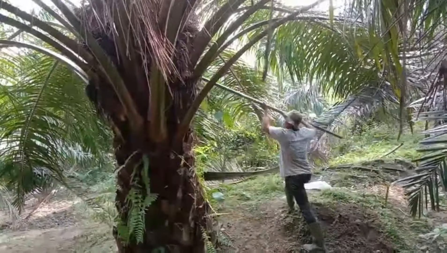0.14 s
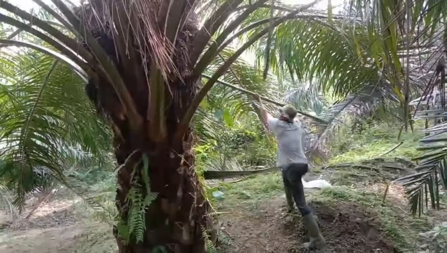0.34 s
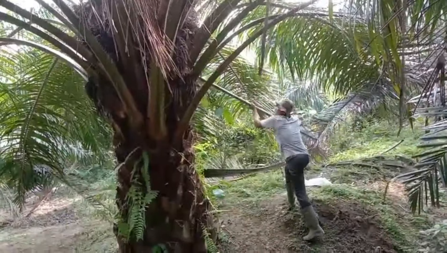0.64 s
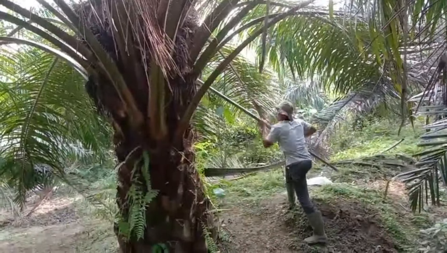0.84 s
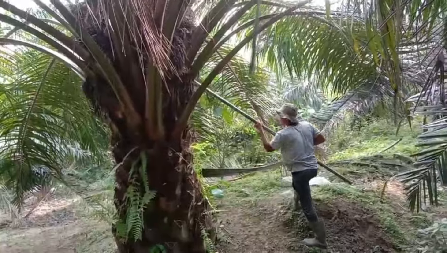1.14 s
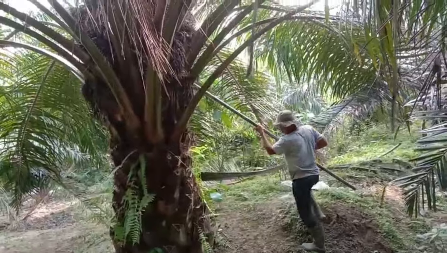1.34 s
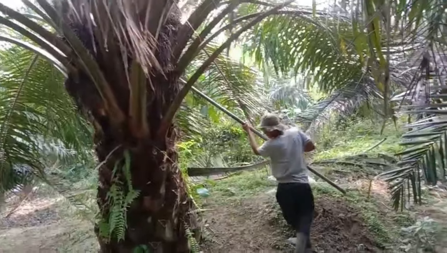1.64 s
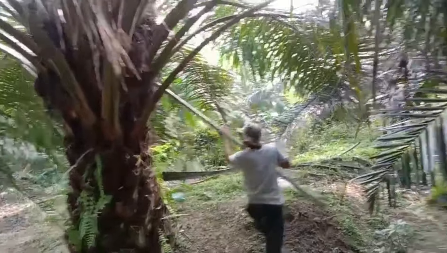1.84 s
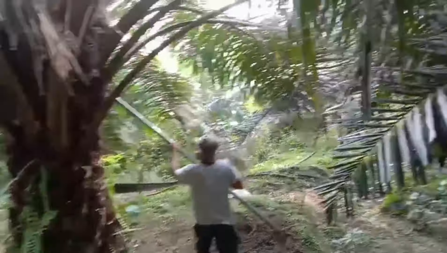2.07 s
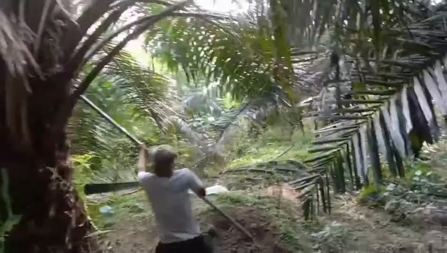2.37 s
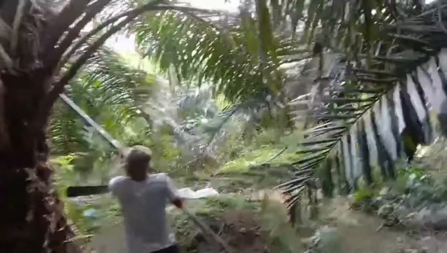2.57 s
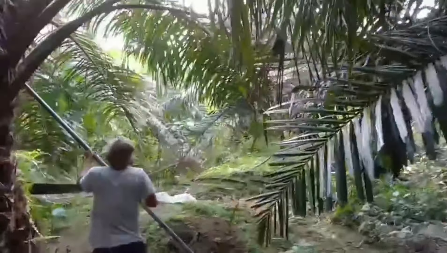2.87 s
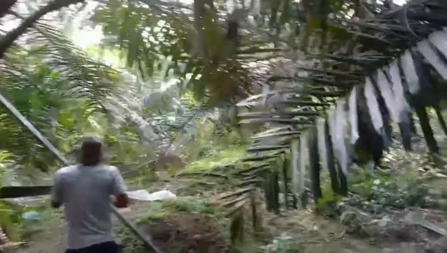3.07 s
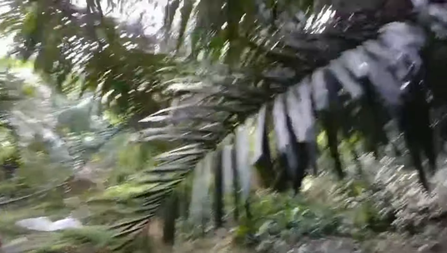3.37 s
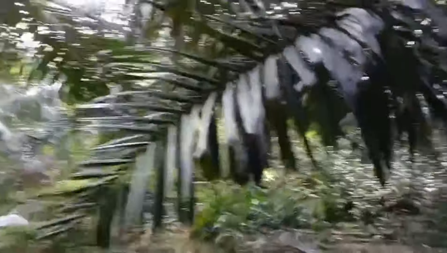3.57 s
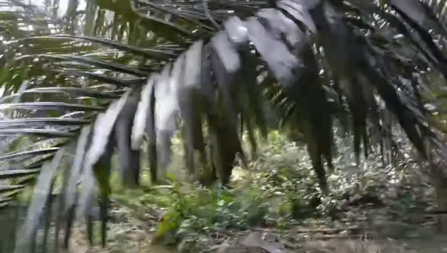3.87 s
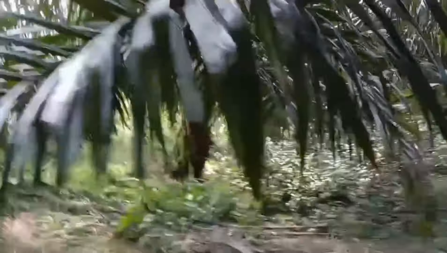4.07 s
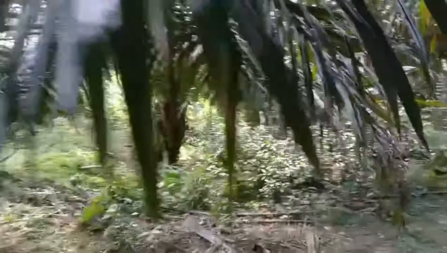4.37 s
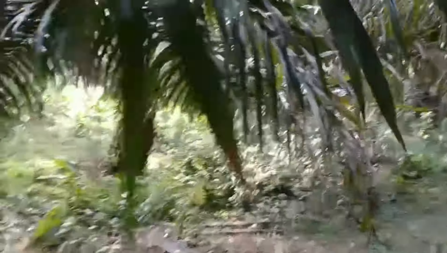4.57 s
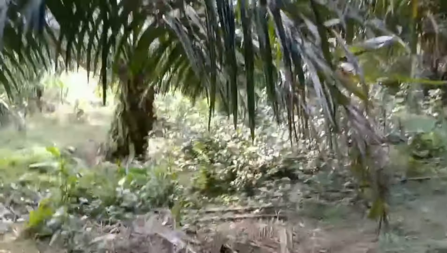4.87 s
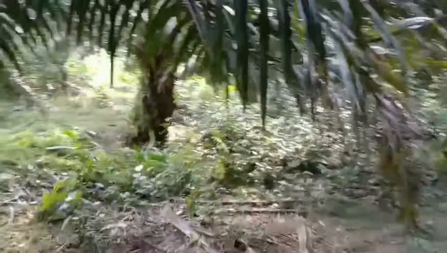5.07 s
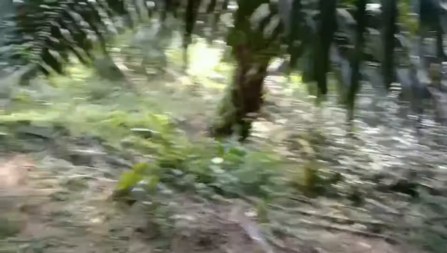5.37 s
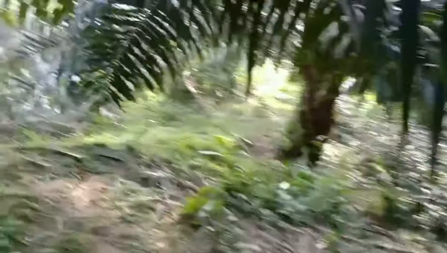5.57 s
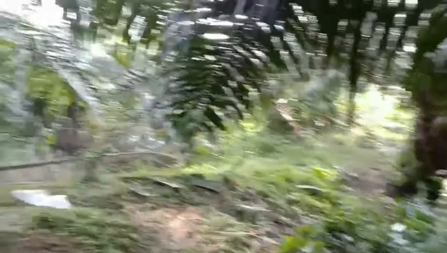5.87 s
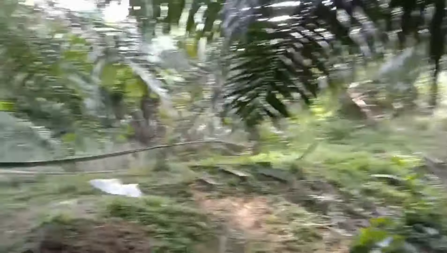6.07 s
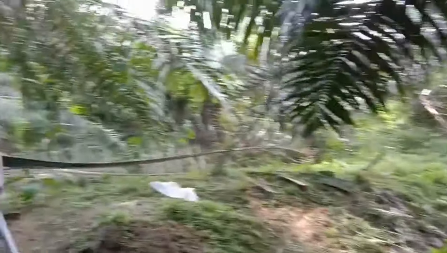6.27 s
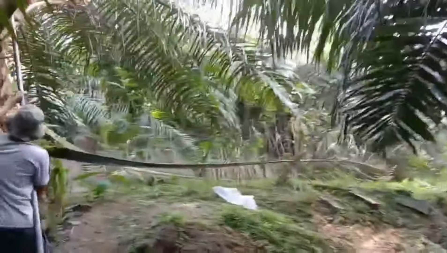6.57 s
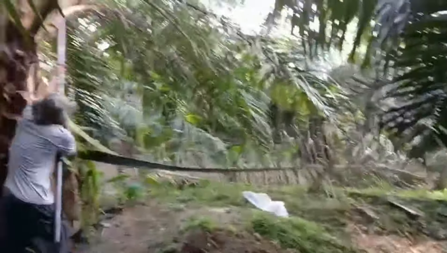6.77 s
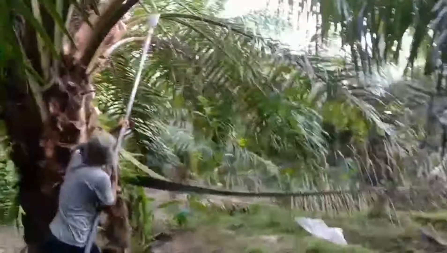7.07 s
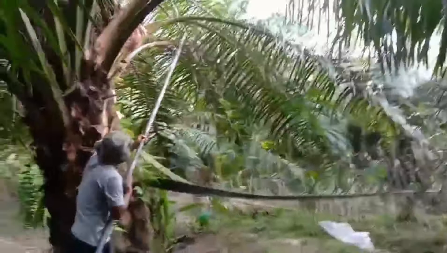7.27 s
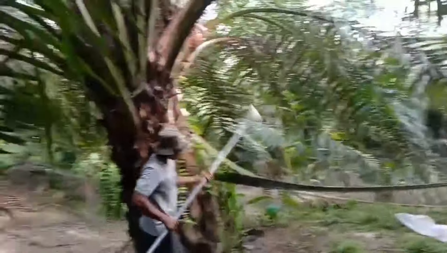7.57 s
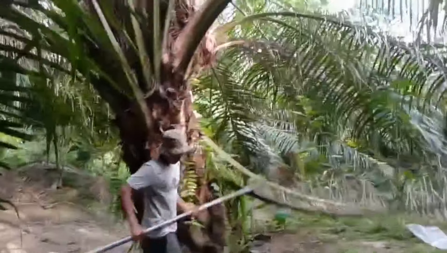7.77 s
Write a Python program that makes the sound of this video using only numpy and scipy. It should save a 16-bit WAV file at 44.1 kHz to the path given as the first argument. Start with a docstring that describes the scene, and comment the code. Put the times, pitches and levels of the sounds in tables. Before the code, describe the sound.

Dry palm fronds rustle, snap and crackle in bursts as a cutting blade and metal pole knock, ending in a loud clanking crash of leaves.

```python
"""Dry palm leaflets rustle and crackle as fronds sweep and snap: flickering bands of hiss, ticks and ringing ribs.
Stalks creak over a blade as a train of small slips, and thump or crack as short pushes of resonating noise.
A long metal pole with a sickle is knocked: its blade, tube and hook ring as dying sine waves with a dull echo.
Patchy, faint noise is the air of the plantation behind it all."""
import sys
import numpy as np
from scipy import signal
from scipy.io import wavfile

SR = 44100
rng = np.random.default_rng(int(sys.argv[2]) if len(sys.argv) > 2 else 0)


def ratio(d):
    """dB to gain"""
    e = np.asarray(d, float) / 20
    return 10 ** e


def wrap_up_sound(samples):
    """Save the sound to the file named by the first command line argument, as 16-bit audio."""
    columns = np.atleast_2d(samples).T
    # keep every value between -1 and 1, then stretch to whole-number steps
    tamed = np.clip(columns, -1, 1)
    steps = np.round(tamed * 32767).astype(np.int16)
    wavfile.write(sys.argv[1], SR, steps)


N = 349713   # length in samples

# Fronds sweeping through the leaves. Each row: start in seconds, length in seconds, level at the start in dB,
# level at the end in dB, woody part in dB relative to it.
SWEEPS = [(0, 0.088, -49.5, -50.5, 8), (0.411, 0.25, -46, -40, 4), (1.772, 0.31, -45.5, -54.5, -8),
          (2.634, 0.24, -40.5, -41.5, -9), (3.374, 0.16, -40.5, -40.5, -9.5),
          (3.659, 0.092, -45, -36.5, -19), (3.853, 0.25, -38, -28.5, -8), (4.24, 0.17, -46, -43, -13),
          (4.459, 0.088, -35, -37.5, -5), (4.797, 0.17, -42, -45.5, -7.5), (5.03, 0.18, -48.5, -44, -14.5),
          (5.25, 0.13, -44.5, -42, -10.5), (5.5, 0.076, -33, -41, -17), (5.78, 0.024, -51.5, -21, -8),
          (5.841, 0.07, -46, -39, -11), (6.024, 0.028, -50, -36, -8), (6.119, 0.019, -41, -33, -16.5),
          (6.418, 0.055, -46, -57, -17), (6.685, 0.51, -37, -46.5, -7), (7.146, 0.31, -44, -35, -12),
          (7.518, 0.22, -42.5, -61, -25), (7.888, .1, -19, -13, -30)]
# Leaves stirring between sweeps. Each row: time in seconds, level in dB.
STIRRING = [(0, -62), (.36, -54), (.85, -85), (1.3, -92), (1.7, -63), (2.3, -56.5), (3.1, -67.5),
            (3.5, -56.5), (5.4, -53), (5.7, -58), (6.5, -65.5), (7.93, -47.5)]
# Snaps that shake the leaflets. Each row: time in seconds, strength in dB, woody part in dB relative to it,
# basic time for the tail to fall by 60 dB in seconds.
SNAPS = [(0.606, -23.5, -21, 0.59), (0.744, -33, -5, 0.16), (1.049, -27, -7.5, 0.37),
         (2.079, -16.5, -14, 0.26), (2.2923, -28, -26, 0.22), (2.415, -21.5, -35, 0.24),
         (2.4804, -19.5, -15, 0.26), (2.5418, -9, -13.5, 0.2), (2.6604, -10, -3, 0.24),
         (2.839, -32.5, -31, 0.63), (3.3023, -17.5, -9.5, 0.15), (3.6002, -11.5, -7, 0.15),
         (3.806, -29.5, 9, 0.16), (3.827, -28.5, 4, 0.32), (3.856, -29, 11, 0.19),
         (3.871, -25.5, 11.5, 0.071), (3.903, -28.5, 7.5, 0.1), (4.026, -14, -3.5, 0.18),
         (4.086, -18, -20, 0.42), (4.4428, -39.5, -11, 1), (4.692, -30.5, -11.5, 0.24),
         (4.77, -42, 10.5, 0.44), (5.026, -31.5, -14, 0.27), (5.173, -26, -10, 0.037),
         (5.225, -31, -25, 0.091), (5.445, -20, -10, 0.095), (5.427, -21, -18, 0.12),
         (6.0068, -24.5, -8, 0.088), (6.021, -26, 4, 0.074), (6.136, -9.5, -29, 0.08),
         (6.1654, -19, -11.5, 0.086), (6.447, -32.5, -22.5, 0.028), (6.486, -39.5, -20, 0.046),
         (6.577, -30, -3, 1), (6.812, -21.5, 0, 0.37), (7.056, -15, -9, 0.62), (7.1228, -7, -4.5, 0.24),
         (7.145, -9.5, -3, 0.15), (7.281, -13, -19, 0.17), (7.3248, -13.5, -20, 0.17),
         (7.811, -6, -1.5, 0.48)]
# Tone colour of the leaves. Each row: frequency in Hz, relative level per Hz in dB.
LEAF_COLOUR = [(35, -48.5), (60, -37.5), (315, -28), (520, -33.5), (767, -29.5), (1700, -7.5), (1950, -6),
               (3270, 0.5), (4120, 2), (5210, 4.5), (9130, 7), (14900, 26.5), (16000, -31)]
# A stalk slipping over the blade in jerks. Each row: start in seconds, length in seconds,
# slips per second at first, strength in dB.
CREAKS = [(.003, .09, 54, -52), (0.392, .12, 84, -59), (0.585, .09, 46, -46), (0.7, 0.089, 60, -66)]
# Resonances of the creaking stalk. Each row: frequency in Hz, width in Hz, relative level in dB.
STALK_MODES = [(248, 69, 0.5), (326, 133, -10), (704, 64, -13.5)]
# Heavy stalks landing and knocking, and a few deep low thuds. Each row: time in seconds, peak in dB, frequency
# in Hz.
THUMPS = [(0.293, -44.5, 229), (.511, -35.5, 250), (2.099, -39.5, 264), (2.548, -42.5, 287),
          (2.66, -26, 255), (3.49, -33.5, 172), (3.89, -43, 224), (4.043, -31, 136), (4.05, -35, 67),
          (4.108, -32, 172.5), (4.33, -43, 555), (4.442, -36, 474), (4.81, -42, 476), (5.26, -49.5, 118),
          (5.255, -42.5, 530), (5.8, -40, 350), (5.87, -42, 235), (6.7, -42, 215), (6.801, -39.5, 346),
          (7.065, -24, 246), (7.128, -27.5, 258), (7.813, -5, 1490), (7.816, -27, 346)]
# Dry ribs cracking. Each row: time in seconds, peak in dB, frequency in Hz.
CRACKS = [(2.542, -35, 2650), (2.662, -15.5, 1610), (2.838, -34, 3040), (3.806, -28.5, 816),
          (4.684, -25.5, 5300), (5.1735, -25, 1560), (5.174, -21.5, 6140), (5.3038, -24, 4870),
          (5.3985, -21, 5270), (5.4125, -17.5, 5100), (5.4259, -27, 1780), (5.4452, -28.5, 1740),
          (6.136, -26, 3330), (6.38, -38.5, 1980), (6.583, -31, 1180), (7.341, -35, 1870),
          (7.418, -34, 2630)]
# Knocks on the blade. Each row: time in seconds, strength in dB, ring time as a multiple of the free one.
BLADE_KNOCKS = [(2.08, -32, 1.2), (2.293, -46, 1.1), (2.416, -48, 1), (2.48, -44, 1), (2.544, -39, .9),
                (2.6, -42, .9), (2.665, -42, 1), (3.301, -34, .9), (3.6, -43, 1.2), (4.09, -41, .6)]
# The pole bumping along a stalk, damped where leaves lie on it. Each row: time in seconds,
# tube strength in dB, sickle strength in dB, ring time as a multiple of the free one.
POLE_KNOCKS = [(4.03, -33, -42, .35), (4.085, -33, -39, .35), (6.828, -55, -41, .8), (7.06, -28, -31, 1.1),
               (7.074, -45, -28, .9), (7.126, -38, -26, .6), (7.143, -40, -23, .7), (7.16, -44, -27, 1),
               (7.817, -24, -36, 1), (7.845, -34, -36, .9), (7.876, -29, -40, 1)]
# Tones of the blade. Each row: frequency in Hz, relative level in dB, free time to fall by 60 dB in seconds.
BLADE_MODES = [(2838, 0, .33), (2861, -2, .28), (3144, -3, .17), (8040, -6, .2), (8110, -4, .2)]
# Tones of the pole's tube. Each row: frequency in Hz, relative level in dB, free time to fall by 60 dB in seconds.
TUBE_MODES = [(1104, 5, .33), (1674, -2, .3), (2330, -10, .15), (2842, -9, .25), (3564, -10, .2),
              (4640, -7, .14), (5100, -7, .14)]
# Tones of the sickle and its socket. Each row: frequency in Hz, relative level in dB,
# free time to fall by 60 dB in seconds.
HOOK_MODES = [(703, -30, 1.5), (706.3, -36, 1.5), (931, -3, .15), (1296, -12, .3), (1760, -8, .22),
              (1836, 0, .3), (2083, -8, .22), (2600, -7, .16), (3165, -4, .25), (3693, -12, .9),
              (3958, -9, .6), (3966, -11, .6)]
# The echo from the ground. Each row: delay in seconds, level in dB.
ECHOES = [(.013, -9)]
# Tone colour of the air. Each row: frequency in Hz, relative level per Hz in dB.
AIR_COLOUR = [(40, 8.5), (110, -4), (570, -19.5), (1630, -4), (4240, -17.5), (5310, -4.5), (16000, -35)]

STIR_WOODY_DB = -13
SWELL_DB_PER_S, FADE_DB_PER_S = 293, 261        # before and after each sweep
CRISP_DB, CRISP_PER_WOODY = -31.5, -0.71        # woodier sweeps are duller
CRACKLE_T60_S = 0.012                           # the quick first part of a snap
SNAP_RISE_S, RISE_PER_TAIL = 0.00014, 0.011     # longer tails rise more slowly
SNAP_BODY_DB, SNAP_CRISP_DB = -9.5, -21
SLOWING_PER_S, SLIP_SPREAD_DB = 3.6, 5.5        # the slips thin out as the pull eases
REBOUND_S, REBOUND_DB = 0.013, -3.5             # each slip rebounds once
KNOCK_RISE_S = 0.002
AIR_DB = -70.5


def rms_one(x):
    """Scales a sound to an average strength (rms) of 1."""
    return x / np.sqrt(np.mean(x ** 2) + 1e-20)


def at_hz(points, hz):
    """Reads a tone colour in dB at any frequency, with straight lines over log frequency."""
    point_hz, db = np.transpose(points)
    return np.interp(np.log(hz), np.log(point_hz), db)


def power(spectrum, low, high):
    """Adds up the power of a tone colour between two frequencies."""
    return np.sum(ratio(at_hz(spectrum, np.arange(low, high))) ** 2) * 2 / SR


def drift(rate):
    """Slow random wandering of spread 1: noise smoothed twice at a 20th of the sample rate."""
    r = np.exp(-40 * np.pi * rate / SR)
    noise = rng.standard_normal(N // 20 + 2002)
    slow = signal.lfilter([1], [1, -2 * r, r * r], noise)[2000:]   # skip the start-up
    return np.interp(np.arange(N) / 20, np.arange(len(slow)), rms_one(slow))


def resonate(x, hz, width_hz):
    """A resonance that favours one frequency, with gain 1 on top."""
    r = np.exp(-np.pi * width_hz / SR)
    turn = 2 * np.pi * hz / SR
    return signal.lfilter([(1 - r * r) / 2, 0, (r * r - 1) / 2], [1, -2 * r * np.cos(turn), r * r], x + 1e-18)


def ring(clicks, hz, t60):
    """Each unit click sets off a dying sine wave that starts with height 1."""
    r, turn = ratio(-60 / (t60 * SR)), 2 * np.pi * hz / SR
    return signal.lfilter([0, np.sin(turn)], [1, -2 * r * np.cos(turn), r * r], clicks + 1e-18)


def grains(per_s, spread_db):
    """Random clicks, most small and a few large, with rms 1."""
    sizes = ratio(spread_db * np.minimum(rng.exponential(1, N), 5))
    signed = sizes * rng.choice([-1, 1], N)
    return rms_one(signed * (rng.random(N) < per_s / SR))


def banded(spectrum, sources, gains, patchy_db):
    """Third-octave bands of two sources in turn flicker; woody, middle and crisp gains blend across them."""
    out = 0
    edges = 48.5 * 2 ** (np.arange(26) / 3)
    woody, middle, crisp = np.log(gains)
    for k, (low, high) in enumerate(zip(edges, edges[1:])):
        hz = np.sqrt(low * high)
        band_filter = signal.butter(2, [low, high], "band", fs=SR, output="sos")
        band = signal.sosfilt(band_filter, sources[k % 2])
        blend = middle + (woody - middle) / (1 + (hz / 1600) ** 5)
        blend = blend + (crisp - middle) / (1 + (9000 / hz) ** 7)
        flicker_db = patchy_db * (drift(14.7) + 1.62 * drift(2.46))
        out = out + np.exp(blend) * ratio(at_hz(spectrum, hz) + flicker_db) * band
    return out


def leaflets():
    """Dry leaflets tick in clumps over hiss and ringing ribs; sweeps swell and fade, snaps rise at once."""
    now = np.arange(N) / SR
    stir_db = np.interp(now, *np.transpose(STIRRING))
    # three rows of power over time: woody, middle and crisp
    stir_crisp_db = CRISP_DB + CRISP_PER_WOODY * STIR_WOODY_DB
    parts = ratio([stir_db + STIR_WOODY_DB, stir_db, stir_db + stir_crisp_db]) ** 2

    for s, length, first_db, last_db, woody_db in SWEEPS:
        near = slice(max(round((s - .2) * SR), 0), round((s + length + .3) * SR))
        t = now[near] - s
        db = np.interp(t, [0, length], [first_db, last_db])
        db = db - SWELL_DB_PER_S * np.maximum(-t, 0) - FADE_DB_PER_S * np.maximum(t - length, 0)
        balance_db = np.array([[woody_db], [0], [CRISP_DB + CRISP_PER_WOODY * woody_db]])
        parts[:, near] += ratio(db + balance_db) ** 2

    t = np.arange(SR // 2) / SR
    for s, strength_db, woody_db, t60 in SNAPS:
        lasting = max(t60, .02) * np.array([[1.1], [1], [.8]])   # the treble dies first
        rise = np.minimum(t / (SNAP_RISE_S + RISE_PER_TAIL * t60), 1)
        shape = (ratio(-60 * t / CRACKLE_T60_S) + ratio(-60 * t / lasting)) * rise
        balance_db = np.array([[woody_db], [0], [SNAP_CRISP_DB]])
        snap = ratio(strength_db + SNAP_BODY_DB + balance_db) * shape
        at = round(s * SR) - 30   # a few samples early
        parts[:, at:at + len(t)] += snap[:, :N - at] ** 2

    # allow for the power that the tone colour already has in each range
    parts /= [[power(LEAF_COLOUR, 400, 1500)], [power(LEAF_COLOUR, 1800, 9000)], [power(LEAF_COLOUR, 9500, 15500)]]
    ticks = grains(900 * ratio(4 * drift(25)), spread_db=4.7)
    sources = .6 * rng.standard_normal((2, N)) + .5 * ticks + .62 * ribs(cycles=190)
    return banded(LEAF_COLOUR, sources * ratio(1.5 * drift(9)), np.sqrt(parts), patchy_db=1.6)


def ribs(cycles):
    """Stiff midribs, flicked at random, each ring at their own pitch and fall by 60 dB in some cycles; rms 1."""
    pitches = np.geomspace(400, 6000, 40) * rng.uniform(.97, 1.03, 40)
    return rms_one(sum(hz * ring(grains(45, spread_db=2), hz, cycles / hz) for hz in pitches))


def creak():
    """Each slip is a soft pulse of uneven size, with a puff of fibre noise, into the stalk's resonances."""
    slips = np.zeros(N)
    for s, length, per_s, db in CREAKS:
        t = np.arange(round(length * SR)) / SR
        turns = per_s * (1 - np.exp(-SLOWING_PER_S * t)) / SLOWING_PER_S
        uneven = turns + .12 * drift(30)[:len(t)] * (t > 0)
        # one slip each time the count reaches a new whole number
        count = np.floor(np.maximum.accumulate(uneven))
        slips[round(s * SR):][:len(t)] = ratio(db) * np.diff(count, prepend=-1)
    slips *= ratio(SLIP_SPREAD_DB * rng.standard_normal(N))
    slips += ratio(REBOUND_DB) * np.roll(slips, round(REBOUND_S * SR))
    puffs = signal.lfilter([1], [1, -.99], slips) * np.diff(rng.standard_normal(N + 1))
    push = signal.lfilter([.15], [1, -.85], slips + 0.24 * puffs)
    modes = enumerate(STALK_MODES)
    # neighbouring resonances have opposite signs
    return ratio(58.0) * sum((-1) ** k * ratio(db) * resonate(push, hz, width) for k, (hz, width, db) in modes)


def thumps(rows, t60, rise):
    """A short push of noise rings in a hollow stalk or rib and dies; times in seconds."""
    out, t = np.zeros(N + SR), np.arange(SR // 2) / SR
    for s, peak_db, hz in rows:
        push = rng.standard_normal(len(t)) * ratio(-60 * t / t60) * np.minimum(t / rise, 1)
        thump = resonate(resonate(push, hz, 2.0 * hz), hz, 0.18 * hz)
        out[round(s * SR):][:len(t)] += ratio(peak_db) * thump / np.abs(thump).max()
    return out[:N]


def struck(knocks, modes):
    """Each knock sets every tone of the metal ringing, with a strength of its own."""
    out, t = np.zeros(N + SR), np.arange(SR * 3 // 4) / SR
    hz, db, t60 = np.transpose(modes)[..., None]
    for s, knock_db, free in knocks:
        strength_db = knock_db + db + 2.0 * rng.standard_normal(hz.shape)
        fading = ratio(strength_db - 60 * t / (free * t60))
        rings = np.sum(fading * np.sin(2 * np.pi * hz * t), axis=0)
        out[round(s * SR):][:len(t)] += rings * np.minimum(t / KNOCK_RISE_S, 1)
    return out[:N]


def metal():
    """Blade, tube and hook ring when knocked; the pole's knocks reach tube and hook together."""
    on_tube = np.delete(POLE_KNOCKS, 2, 1)   # without the sickle column
    on_hook = np.delete(POLE_KNOCKS, 1, 1)   # without the tube column
    return struck(BLADE_KNOCKS, BLADE_MODES) + struck(on_tube, TUBE_MODES) + struck(on_hook, HOOK_MODES)


def ground_echo(x):
    """The ground returns a delayed copy with softened treble."""
    dull = signal.lfilter([.45], [1, -.55], x)
    return x + sum(ratio(db) * np.pad(dull, (round(s * SR), 0))[:N] for s, db in ECHOES)


def air():
    """Steady noise, coloured and flickering band by band, makes the faint background."""
    noise = banded(AIR_COLOUR, rng.standard_normal((2, N)), np.ones(3), patchy_db=4.0)
    return ratio(AIR_DB) * rms_one(noise)


def scene():
    """Adds leaves, wood, echoing metal and air into one channel."""
    wood = creak() + thumps(THUMPS, t60=0.089, rise=0.0044) + thumps(CRACKS, t60=0.016, rise=0.0001)
    return (leaflets() + wood + ground_echo(metal()) + air())[None]


def band_limit(x):
    """A steep low-pass at the top of the band."""
    return signal.sosfilt(signal.butter(12, 16690, fs=SR, output="sos"), x)


def record(dry):
    """The microphone drops the deepest bass and has two dips; then the very top is cut."""
    heard = signal.sosfilt(signal.butter(2, 75, "high", fs=SR, output="sos"), dry)
    for hz in (4250, 7400):
        heard = heard - .8 * resonate(heard, hz, width_hz=700)
    mix = signal.sosfilt(signal.cheby2(14, 75, 16300, fs=SR, output="sos"), heard)
    return band_limit(mix)


dry = scene()
out = record(dry)
wrap_up_sound(out)
```